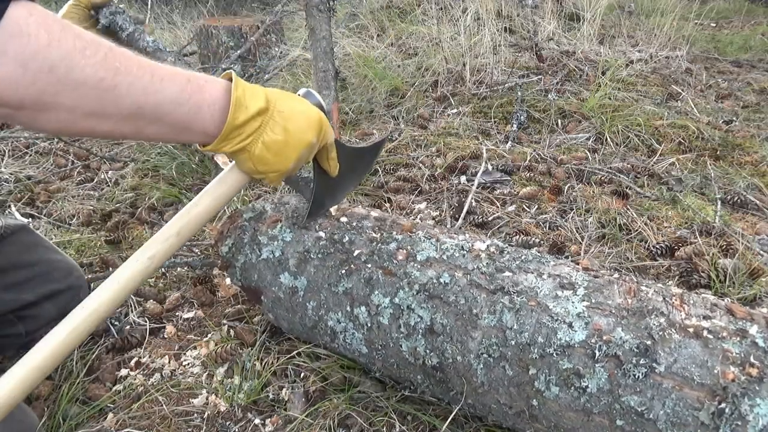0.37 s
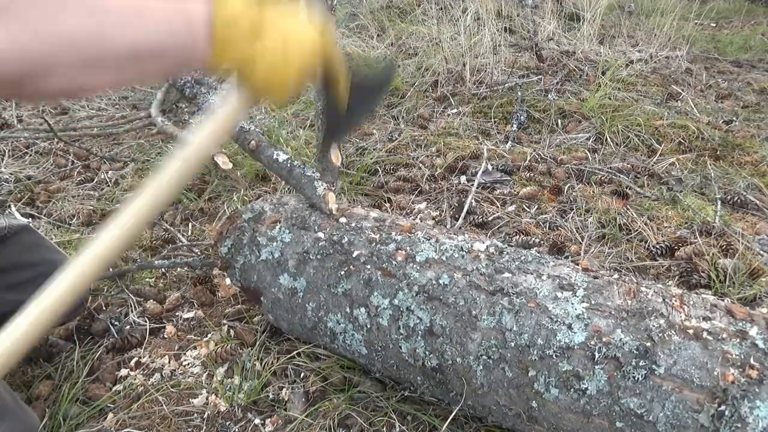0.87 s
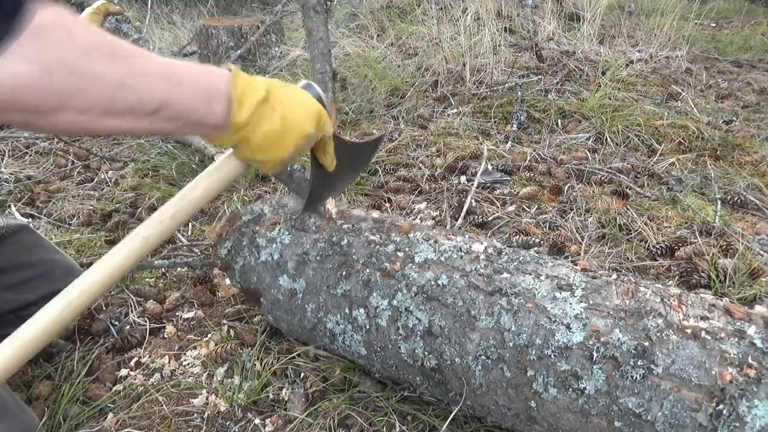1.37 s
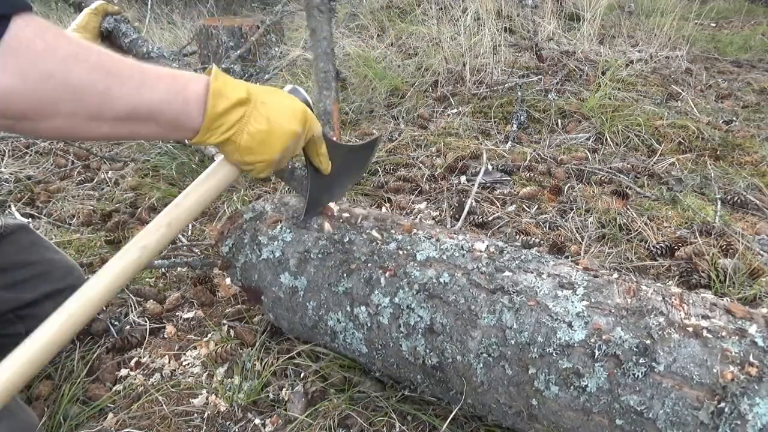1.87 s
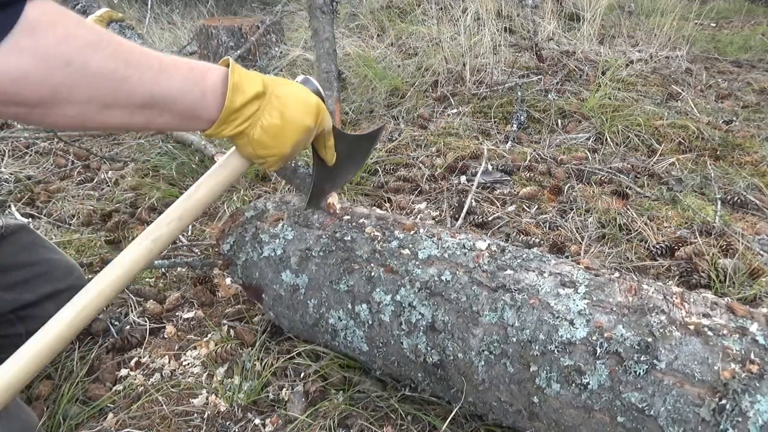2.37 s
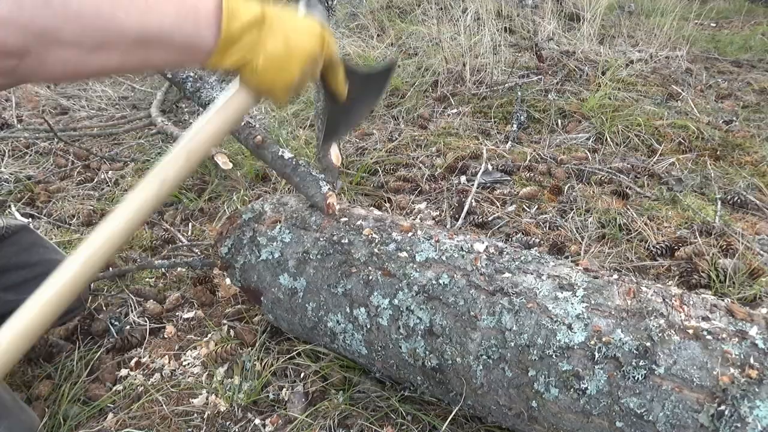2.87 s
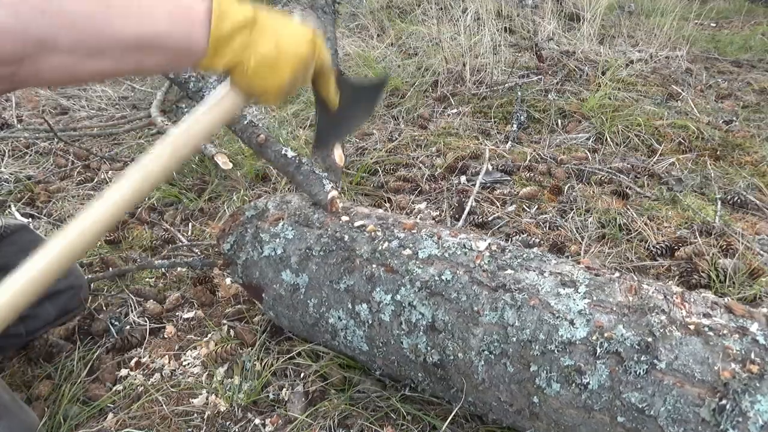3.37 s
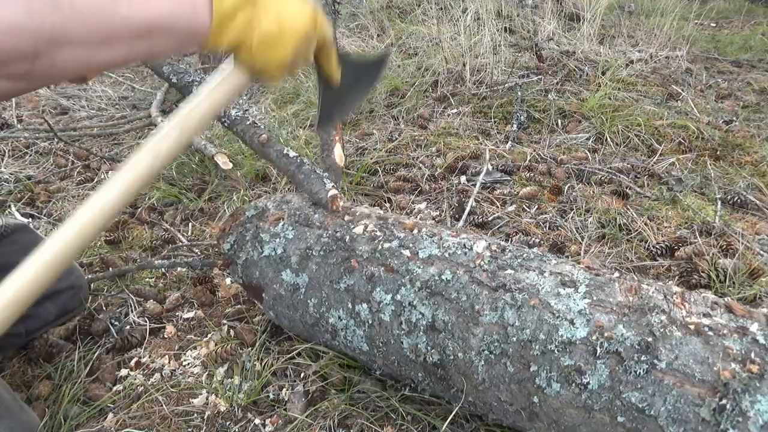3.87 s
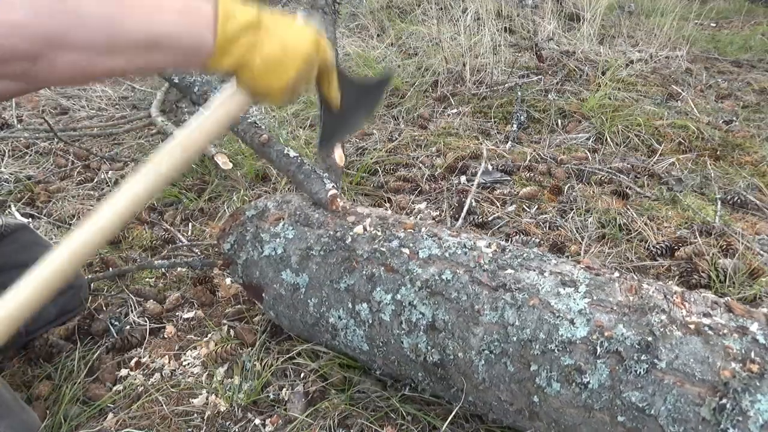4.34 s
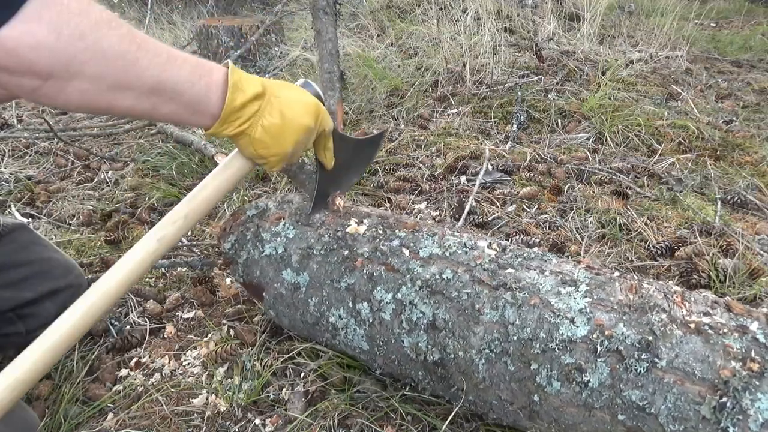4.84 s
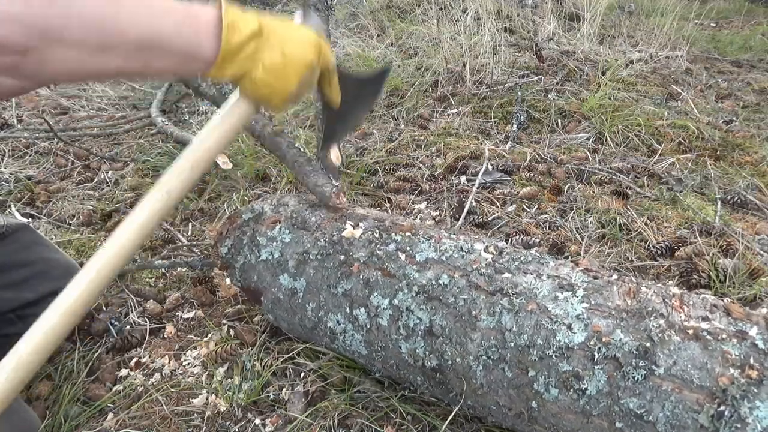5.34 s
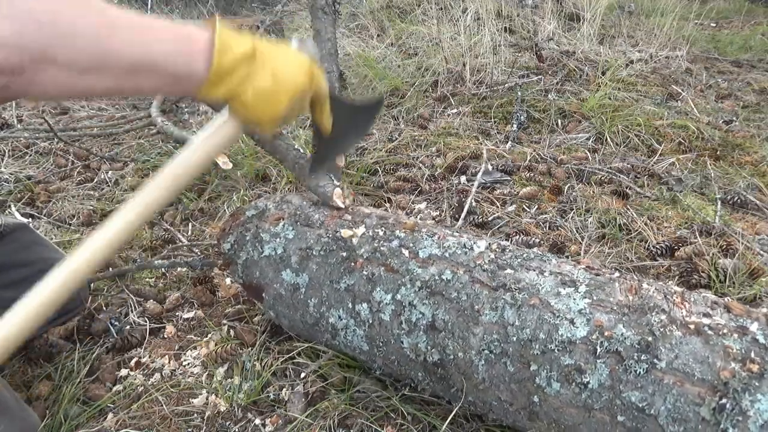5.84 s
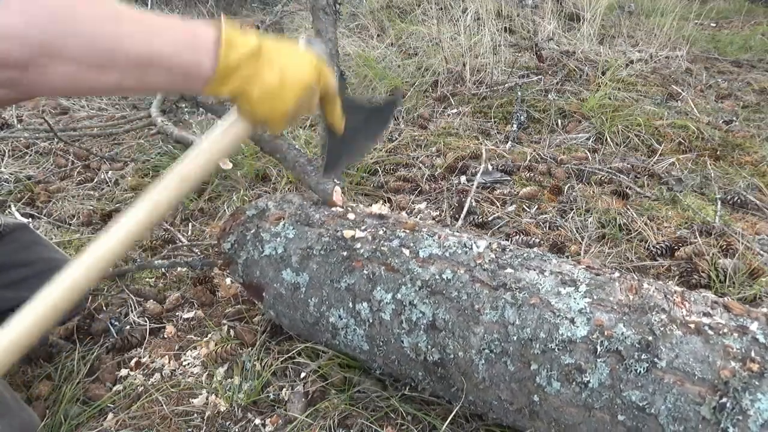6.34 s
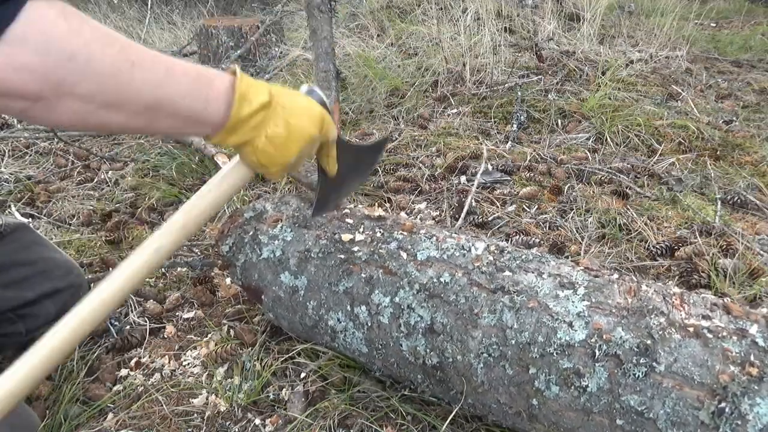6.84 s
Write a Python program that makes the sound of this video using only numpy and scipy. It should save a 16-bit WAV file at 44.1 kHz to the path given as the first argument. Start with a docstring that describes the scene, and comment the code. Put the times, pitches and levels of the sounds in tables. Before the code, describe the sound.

Close, dry woody axe blows in quick runs with short pauses, knocking on a log outdoors, with splinters, twig snaps and faint steel ringing.

```python
"""Hard, woody axe blows on a branch held on a fallen log, close by in a quiet wood, each with a dull thump after it.
A shock rings decaying modes of branch and log, snapping fibres those of the steel; the sum clips at full scale.
Chips, leaves and cloth are grainy noise, twigs and bark short noise bursts, the soil a slow push on low modes.
The blade sings faintly on its bending and twisting modes, at some blows and as it is moved between them."""
import sys
import numpy as np
from scipy import signal
from scipy.fft import rfft, irfft, next_fast_len
from scipy.io import wavfile
from scipy.ndimage import uniform_filter1d

SR = 44100
rng = np.random.default_rng(int(sys.argv[2]) if len(sys.argv) > 2 else 0)


def field_ratio(decibels):
    """Amplitude ratio for a level in dB (20 dB per decade); scalars and array-likes work."""
    return 10 ** (np.asarray(decibels, dtype=float) / 20)


def file_out(sig):
    """Save sig as 16-bit WAV at sys.argv[1]."""
    # one column per channel
    cols = np.atleast_2d(sig).T
    # limit, then scale
    lim = np.clip(cols, -1, 1)
    pcm = np.round(lim * 32767).astype(np.int16)
    wavfile.write(sys.argv[1], SR, pcm)


N = 318402
LEAD = SR // 4  # samples of scene before the start

# axe blows, the last row a small knock as the head bounces: (time [s], force [dB], bite [ms],
# branch note [Hz], steel and splinters [relative dB], log knock [relative dB],
# where the shock enters the log [share of its length, 0-0.5])
BLOWS = [(-.062, -0.5, 7, 1680, -6.5, -8, 0.11), (0.9868, -1.5, 7.5, 1710, -5.5, -11, .03),
         (1.4446, -0.5, 5.5, 1771, -4.5, -3, .035), (1.9005, 0.5, 6.4, 1685, -6, -16.5, .035),
         (2.3357, -1, 7.4, 1632, -10, -6, .49), (3.2089, -1.5, 7.7, 1593, -6, 4, .33),
         (3.698, -2.5, 7.6, 1661, -1, -4.5, 0.21), (4.1898, 1.5, 3.9, 1819, -10.5, -3, 0.19),
         (4.6764, 1, 4.2, 1860, -7.5, 2.5, .165), (5.712, -5.5, 5.9, 1286, 2.5, -6.5, 0.23),
         (6.1953, 0, 11.9, 1706, -7, -15.5, .28), (6.679, -5, 9.2, 1208, 2, 2, .49),
         (6.719, -14.5, 6.4, 1288, -12, -8.5, 0.15)]
# leaves and cloth: (time [s], body level [dB], treble level [dB])
RUSTLE = [(0.0, -60, -59.5), (0.14, -62.5, -56.5), (0.25, -55, -55), (0.58, -55, -57), (0.74, -70, -73),
          (1.01, -71.5, -74.5), (1.12, -62, -68), (1.33, -64.5, -63), (1.5, -65.5, -67.5),
          (1.78, -60, -58.5), (1.87, -65.5, -67), (2.03, -58, -60.5), (2.299, -64.5, -66),
          (2.74, -55.5, -56.5), (2.89, -58, -61.5), (2.99, -71.5, -75), (3.2, -69.5, -74), (3.38, -57, -60),
          (3.68, -63.5, -65.5), (3.9, -66.5, -64.5), (4.059, -59.5, -59), (4.2, -66, -63.5),
          (4.6, -61.5, -60), (5.09, -52.5, -56), (5.39, -59.5, -56), (5.48, -72, -71.5), (5.7, -66, -75.5),
          (5.87, -56, -57.5), (6.05, -57, -58.5), (6.25, -66.5, -62.5), (6.54, -57.5, -55.5),
          (7.08, -57, -60.5), (7.22, -63, -64.5)]
# blade bending modes: (frequency [Hz], level [dB], t60 [s])
BENDING = [(4092, 0, .7), (6121, -2, .4), (8490, 2, .17), (11405, -6, .3), (14605, -5, .45)]
# blade twisting modes: (frequency [Hz], level [dB], t60 [s])
TWISTING = [(5105, 3, .2), (6460, -4, .1), (8850, -2, .14), (11960, -6, .08)]
# spectrum of chips and of the grazing edge: (frequency [Hz], density [dB])
CHIPS = [(88, -33.5), (150, -1.5), (341, -13), (422, -9), (504, -13), (790, -13.5), (1360, -12),
         (2310, -11.5), (6500, -23), (8700, -21), (10000, -30), (14800, -31), (16000, -38.5)]


def unit(x):
    """Scale to rms 1."""
    return x / np.sqrt(np.mean(x ** 2))


def add(track, s, sound):
    """Mix a sound in at a time in seconds."""
    i = LEAD + int(s * SR)
    track[i:i + len(sound)] += sound[:len(track) - i]


def high_pass(x, order, cutoff_hz):
    """Butterworth high-pass."""
    return signal.sosfilt(signal.butter(order, cutoff_hz, "high", fs=SR, output="sos"), x)


def colour(x, spectrum):
    """Shape by (Hz, dB) points, straight over log frequency; rms 1."""
    size = next_fast_len(len(x))
    hz, db = np.transpose(spectrum)
    f = np.maximum(np.arange(size // 2 + 1) * SR / size, 1)
    gain = field_ratio(np.interp(np.log(f), np.log(hz), db))
    return unit(irfft(rfft(x, size) * gain, size)[:len(x)])


def pulse(t, centre_s, width_s):
    """A smooth push of unit area."""
    shape = np.exp(-.5 * ((t - centre_s) / width_s) ** 2)
    return shape / shape.sum()


def ring(push, modes, seconds):
    """A force history excites decaying modes (Hz, dB, t60 s)."""
    t = np.arange(int(seconds * SR)) / SR
    hz, db, t60 = (c[:, None] for c in np.transpose(modes))
    response = field_ratio(db) * np.sin(2 * np.pi * hz * t) * 1000. ** (-t / t60)
    return signal.fftconvolve(push, response.sum(0))


def varied(modes, spread_db, spread_pitch, damping):
    """Each touch lands elsewhere: modes vary in strength and pitch, and t60 is scaled by damping."""
    hz, db, t60 = np.transpose(modes)
    chance = rng.standard_normal((2, len(hz)))
    return np.transpose([hz * (1 + spread_pitch * chance[0]), db + spread_db * chance[1], t60 * damping])


def tilted(modes, db_per_octave, centre_hz):
    """Weight modes so that they fall away on both sides of a centre."""
    hz, db, t60 = np.transpose(modes)
    octaves = np.log2(hz / centre_hz)
    return np.transpose([hz, db - db_per_octave * np.abs(octaves), t60])


def crackle(size, per_s, spread_db):
    """Noise whose level jumps grain by grain, now and then much louder; rms 1."""
    hold = max(int(SR / per_s), 1)
    jumps = np.minimum(rng.exponential(size=size // hold + 1), 4)
    level = np.repeat(field_ratio(spread_db * jumps), hold)[:size]
    return unit(rng.standard_normal(size) * uniform_filter1d(level, hold))


def patter(size, spectrum):
    """Grains of many sizes: quicker in each higher octave, over a crackle that all share."""
    grains = 0
    for hz in 250 * 2. ** np.arange(6):
        band = signal.butter(2, [hz, 2 * hz], "band", fs=SR, output="sos")
        grains = grains + signal.sosfilt(band, crackle(size, 110. + hz / 40, 4.2))
    return colour(grains + .35 * crackle(size, 300., 3.6), spectrum)


def tick(db, centre_hz):
    """A short burst of snapping around a centre pitch; low ticks last longer."""
    t = np.arange(SR // 25) / SR
    edges_hz = np.clip([centre_hz / 4.0, centre_hz * 1.7], 50, .4 * SR)
    band = signal.butter(2, edges_hz, "band", fs=SR, output="sos")
    burst = signal.sosfilt(band, crackle(len(t), 2500., 2.))
    fade_s = .0015 + 4 / centre_hz  # a fixed time plus four cycles
    return field_ratio(db) * unit(burst) * np.exp(-t / fade_s) * np.clip(t / .0003, 0, 1)


def still_air():
    """Steady coloured noise: the air of the wood."""
    # (frequency [Hz], density [dB])
    spectrum = [(15, -49), (25, -15.5), (55, -8.5), (127, -10), (158, -5.5), (196, -16), (237, -11.5),
                (397, -21.5), (1340, -22.5), (1460, -35.5), (16300, -34)]
    return field_ratio(-63.5) * colour(rng.standard_normal(N), spectrum)


def rustle():
    """Dry leaves and sleeves: grains whose body and treble follow their own levels and waver together."""
    # (frequency [Hz], density [dB])
    spectrum = [(88, -30), (150, 0), (213, -8.5), (578, -3.5), (1240, -7.5), (1480, -4), (3350, -6),
                (5500, -8), (7000, -6.5), (8600, -2), (9900, -12), (14800, -10.5), (16000, -18.5)]
    waver_db, wavers_per_s = 2.5, 16
    s, body_db, treble_db = np.transpose(RUSTLE)
    t = np.arange(N) / SR
    waver = waver_db * np.interp(t * wavers_per_s, np.arange(200), rng.standard_normal(200))
    leaves = patter(N, spectrum)
    body = signal.sosfilt(signal.butter(2, 4500, fs=SR, output="sos"), leaves)
    treble = leaves - body
    body = unit(body) * field_ratio(np.interp(t, s, body_db) + waver)
    return body + unit(treble) * field_ratio(np.interp(t, s, treble_db) + waver)


def small_ticks(track):
    """Small snaps strewn through the rustle, following its body level."""
    per_s, over_rustle_db, centre_hz = 9, 9, 5500
    at_s, body_db, _ = np.transpose(RUSTLE)
    for when, size, octaves in rng.random((100, 3))[:int(per_s * N / SR)]:
        s = when * N / SR
        db = np.interp(s, at_s, body_db) + over_rustle_db + 8.8 * (size - .5)
        add(track, s, tick(db, centre_hz * 2 ** (1.7 * (octaves - .5))))


def loud_ticks(track):
    """Twigs, chips and bark snap singly."""
    # (time [s], level [dB], centre [Hz])
    snaps = [(0.0372, -39, 4980), (0.2234, -36, 3650), (0.4732, -37, 5410), (0.5468, -43.5, 5580),
             (1.1169, -40, 3855), (1.152, -39.5, 380), (1.1597, -35.5, 2970), (1.4141, -27.5, 5500),
             (1.8386, -38, 7300), (2.0463, -38.5, 7530), (2.1654, -40.5, 7910), (2.833, -35.5, 10270),
             (2.9002, -43.5, 4950), (3.3418, -30, 10670), (3.3524, -37, 3370), (3.3765, -40.5, 7850),
             (3.582, -41.5, 10890), (5.0743, -36.5, 7760), (5.0924, -44, 11400), (5.2966, -34.5, 9690),
             (6.067, -42, 7830), (6.1781, -25.5, 6960), (6.3805, -29, 5850), (6.479, -37.5, 8850),
             (6.4975, -28.5, 5080), (6.524, -31.5, 7800), (6.6198, -40, 7640), (6.6401, -19, 8180),
             (6.8582, -40.5, 1970), (6.8939, -20.5, 3650), (6.9201, -36.5, 3200), (7.0425, -38, 8060)]
    for s, db, centre_hz in snaps:
        add(track, s, tick(db, centre_hz))


def scrapes(track):
    """The edge drags over bark as grainy noise, catching again and again in small slips."""
    # (time [s], length [ms], level [dB])
    drags = [(1.414, 27, -37), (6.178, 16, -42.5), (6.638, 39, -35), (6.895, 26, -48)]
    slip_s, slip_over_drag_db, slip_hz = .0065, 4, 6500
    spectrum = [(300, 0.5), (2000, -1.0), (7000, -1.5), (15000, -10.5)]
    for s, length_ms, db in drags:
        size = int(length_ms * SR / 1000)
        add(track, s, field_ratio(db) * colour(crackle(size, 800.0, 2.5), spectrum))
        chance = rng.standard_normal((8, 3))
        late = np.cumsum(slip_s * (1 + .12 * chance[:, 0]))
        for late_s, (_, size_db, octaves) in zip(late, chance):
            if late_s < length_ms / 1000:
                slip = tick(db + slip_over_drag_db + 2.7 * size_db, slip_hz * 2 ** (0.26 * octaves))
                add(track, s + late_s, slip)


def singing_blade(track):
    """The blade rings faintly, some touches right at a blow, others as it is moved, until stilled."""
    # (time [s], steel [dB], frequency the touch favours [Hz], twisting re bending [dB])
    touches = [(1.591, -57, 14000, -19), (2.049, -49, 4400, -22.5), (2.046, -53, 11400, -24),
               (2.835, -60.5, 4400, -1.5), (3.212, -47, 6700, 12.5), (3.279, -53, 14600, -15),
               (3.34, -47, 9800, -19.5), (3.371, -45.5, 9000, -18), (4.355, -55, 8650, 6.5),
               (5.716, -45.5, 5600, 7.5), (6.2, -47.5, 4210, -20), (5.319, -61, 14000, -11.5),
               (6.335, -63, 7070, 9), (6.689, -40.5, 6300, -15), (6.896, -60, 13500, -6.5)]
    rise_s, stilled_s = 0.002, 0.099
    t = np.arange(int(.4 * SR)) / SR
    swell = np.clip(t / rise_s, 0, 1) / (1 + (t / stilled_s) ** 6)
    for s, steel_db, favoured_hz, twist_db in touches:
        for modes, db in ((BENDING, steel_db), (TWISTING, steel_db + twist_db)):
            add(track, s, field_ratio(db) * swell * ring(np.ones(1), tilted(modes, 15., favoured_hz), .4))


def handle_rings(track):
    """The handle hums on its own mode, then is stilled."""
    # (time [s], level [dB])
    hums = [(3.37, -74), (3.83, -58), (4.318, -49.5)]
    # (frequency [Hz], level [dB], t60 [s])
    modes = [(470, 0, 0.49)]
    rise_s, stilled_s = .01, .17
    t = np.arange(int(.4 * SR)) / SR
    swell = np.clip(t / rise_s, 0, 1) / (1 + (t / stilled_s) ** 6)
    for s, db in hums:
        add(track, s, field_ratio(db) * swell * ring(np.ones(1), modes, .4))


def thuds(track):
    """A slow push into soft ground, pulling the air first, excites low modes and a scattered rumble."""
    # (frequency [Hz], level [dB], t60 [s])
    soil = [(77, -1, 0.065), (66, -9, 0.24), (80.5, -11.5, 0.17), (165, -28, .3)]
    lag_s, level_db, db_per_knock_db = .032, -24.5, 0.12  # lag from blow to the soil's crest
    knee_db = -7  # lighter blows than this thud less
    rumble_spectrum = [(30, -25.5), (50, -5.5), (70, -1.5), (95, -6.5), (130, -22), (400, -58.5)]
    t = np.arange(SR // 2) / SR
    thud = -ring(pulse(t[:SR // 30], .012, .0026), soil, .5)[:len(t)]
    thud = high_pass(thud, 2, 40)  # the deepest part stays in the ground
    for s, force_db, _, _, _, knock_db, _ in BLOWS:
        db = level_db + db_per_knock_db * knock_db + 2 * min(force_db - knee_db, 0)
        rumble = colour(rng.standard_normal(len(t)), rumble_spectrum)
        rumble = field_ratio(-15.5) * rumble * np.clip(t / .05, 0, 1) ** 2 * np.exp(-t / 0.099)
        add(track, s + lag_s - np.argmax(thud) / SR, field_ratio(db) * (thud / thud.max() + rumble))


def graze(track, s):
    """The edge brushes lichen and bark, louder and louder, just before it bites."""
    length_s = 0.0092
    swell = np.arange(int(length_s * SR)) / (length_s * SR)
    noise = colour(rng.standard_normal(SR // 2), CHIPS)[:len(swell)]
    add(track, s - length_s, field_ratio(-43) * swell * noise)


def flying_chips(t, steel_db):
    """Chips fly and patter down: a quick burst, then a longer sprinkle that thins abruptly."""
    db_per_steel_db, sprinkle_thins_s = 0.4, .17
    burst = field_ratio(-29.0) * np.exp(-t / 0.0099)
    sprinkle = field_ratio(-36) * np.exp(-t / 0.085) * (0.37 + .7 / (1 + (t / sprinkle_thins_s) ** 12))
    fall = (burst + sprinkle) * np.clip(t / 0.036, 0, 1) ** 0.5
    return field_ratio(db_per_steel_db * (steel_db + 3)) * patter(len(t), CHIPS) * fall


def splinters(t, bite_s, choke, steel_db):
    """Splitting fibres crackle, fiercest part-way into the cut."""
    # (frequency [Hz], density [dB])
    spectrum = [(180, -51.5), (300, -5.5), (1660, -5.5), (2170, -9), (2610, -3.5), (5800, -12.5),
                (6520, -7.5), (10400, -23.5), (11900, -12), (16000, -29)]
    splitting = (t / bite_s) * np.exp(1 - t / (0.44 * bite_s)) * 3
    splitting = splitting + 1.5 * np.exp(-((t - .4 * bite_s) / 0.00078) ** 2)
    noise = colour(crackle(len(t), 5000., 3.3), spectrum)
    return field_ratio(steel_db - 7.5) * noise * choke * splitting


def wedged_steel(snaps, bite_s, steel_db):
    """Snapping fibres ring the blade, heavily damped by the cut that grips it."""
    modes = tilted(varied(BENDING[1:3] + TWISTING, 2.5, .015, .2), 4., 6500)
    return field_ratio(steel_db - 19) * ring(snaps / np.sqrt(bite_s * SR), modes, 0.074)


def strong_log_modes(push, knock_db, place):
    """The log's strong modes, each weak when struck near one of its nodes."""
    # in order of rising pitch: (frequency [Hz], level [dB], t60 [s])
    wood = [(255, -11, 0.042), (448.6, -15.5, 0.097), (685, -12.5, 0.057), (773, -11, 0.084),
            (1082, -11, 0.058), (2610, -9, 0.084)]
    db_per_knock_db, node_leak = .3, .3  # leak: amplitude floor at a node
    struck = []
    for k, (hz, db, t60) in enumerate(wood):
        reach = abs(np.sin(np.pi * (k + 1) * place)) + node_leak
        struck.append((hz, db + 20 * np.log10(reach), t60))
    return field_ratio(db_per_knock_db * knock_db) * ring(push, varied(struck, 2.5, 0.013, 0.94), .3)


def weak_log_modes(push, knock_db):
    """The log's weaker modes between the strong ones, in opposite polarity."""
    # (frequency [Hz], level [dB], t60 [s])
    modes = [(311, -8, 0.1), (409.3, -10.5, 0.16), (557, -8, 0.13), (876, -9, 0.037), (1315, -2.5, 0.057),
             (1355, -4.5, 0.077), (1460, -8, .05), (2250, -14, 0.11)]
    return -field_ratio(knock_db - 11.5) * ring(push, varied(modes, 2.5, 0.06, .8), 0.16)


def cut_branch(shock, choke, note_hz, steel_db):
    """The pinned branch rings at its note until the head stops and chokes it."""
    modes = [(note_hz, 4, .05), (.66 * note_hz, -12, .03), (1.4 * note_hz, -6, .04), (1.12 * note_hz, -6, .04)]
    branch = ring(shock, modes, 0.11)
    # a glancing blow that splinters much sets the note going less
    branch = branch * field_ratio(-.8 * max(steel_db + 7.5, 0))
    rise = np.clip(np.arange(len(branch)) / SR / 0.0042, 0, 1)
    return branch * (choke[:len(branch)] + 0.02) * rise


def blows(track):
    """Shock rings the branch, shock and rebound the log, snapping fibres the steel; splinters and chips scatter."""
    t = np.arange(SR // 2) / SR
    short = t[:SR // 30]
    entry = np.clip(t / 0.00075, 0, 1) ** 2
    for s, force_db, bite_ms, note_hz, steel_db, knock_db, place in BLOWS:
        bite_s = bite_ms / 1000
        choke = np.exp(-np.maximum(t - bite_s, 0) / 0.0016)
        # a hard first shock, then fibres parting one after another
        snaps = crackle(len(short), 3000., 4.8) * (entry * choke)[:len(short)]
        shock = pulse(short, .0016, .00007) + 0.011 * snaps * np.exp(-short / 0.0043)
        # the log rebounds on the ground and knocks a second, duller time
        shock_and_rebound = shock + 0.32 * pulse(short, .026, 0.00022)
        graze(track, s)
        parts = (
            cut_branch(shock, choke, note_hz, steel_db),
            strong_log_modes(shock_and_rebound, knock_db, place),
            weak_log_modes(shock_and_rebound, knock_db),
            wedged_steel(snaps, bite_s, steel_db),
            splinters(t, bite_s, choke, steel_db),
            flying_chips(t, steel_db),
        )
        for part in parts:
            add(track, s - .0012, field_ratio(force_db) * high_pass(part, 3, 170))


def scene():
    """Everything at the chopping log over the still air of the wood."""
    track = np.zeros(LEAD + N)
    for source in (small_ticks, loud_ticks, scrapes, singing_blade, handle_rings, thuds, blows):
        source(track)
    return (still_air() + rustle() + track[LEAD:])[None]


def band_limit(x):
    """A steep low-pass at the top of the band."""
    return signal.sosfilt(signal.butter(12, 16410, fs=SR, output="sos"), x)


def record(dry):
    """The microphone sheds the deepest bass and the input clips at full scale."""
    heard = high_pass(dry, 3, 44)
    return band_limit(np.clip(heard, -1, 1))


dry = scene()
out = record(dry)
file_out(out)
```